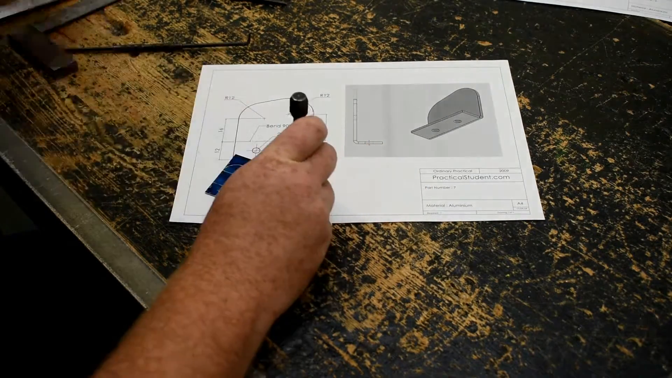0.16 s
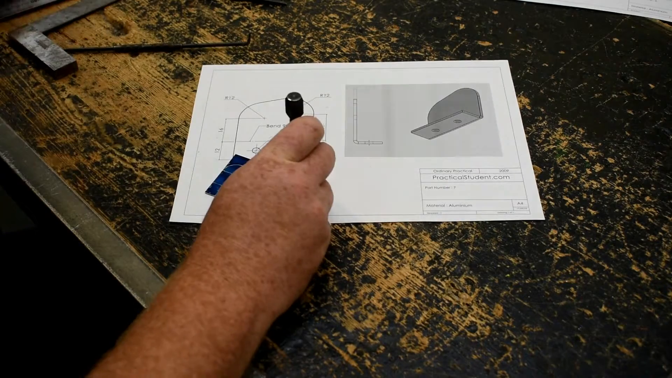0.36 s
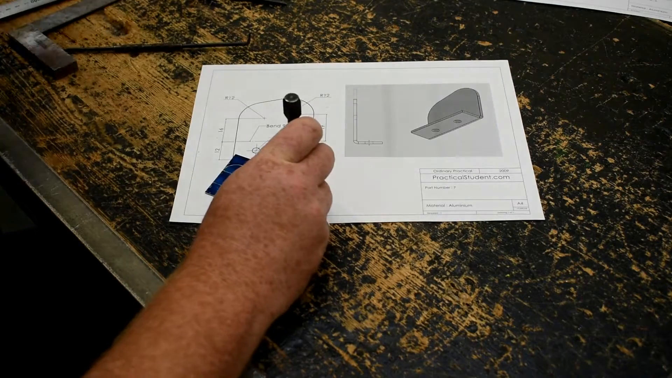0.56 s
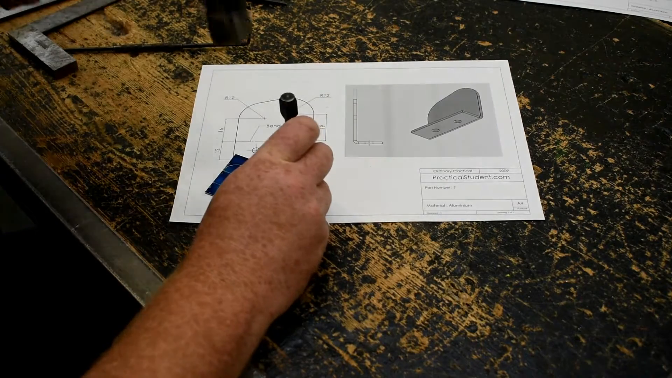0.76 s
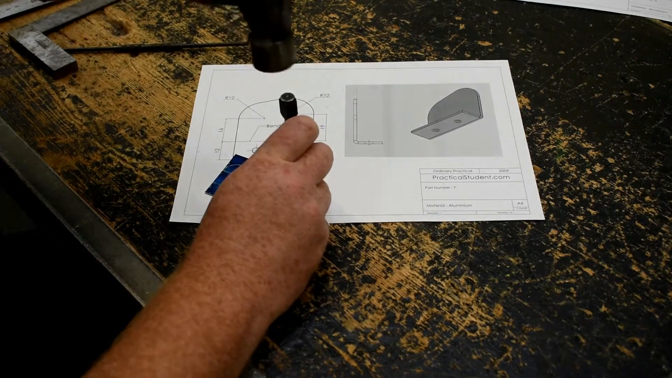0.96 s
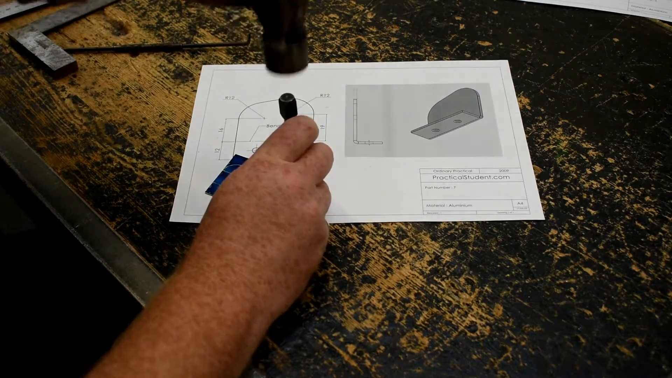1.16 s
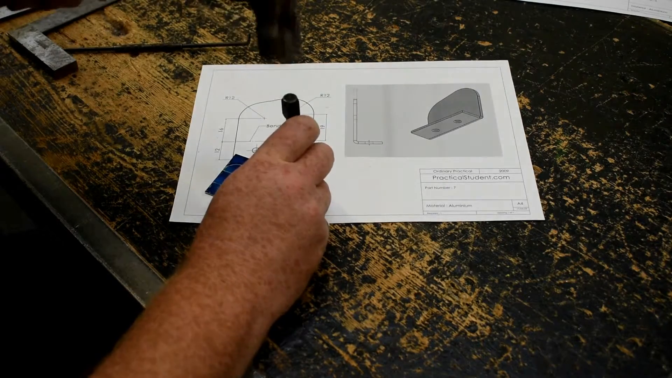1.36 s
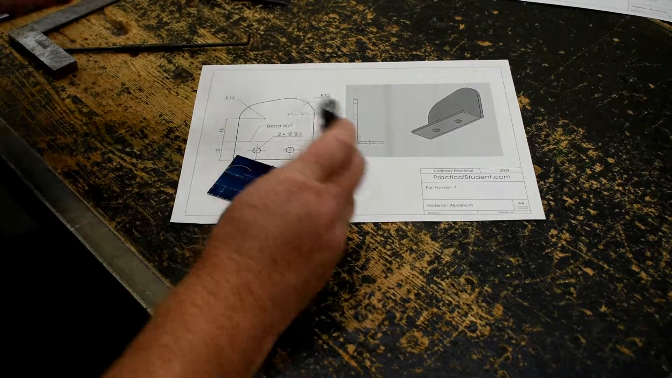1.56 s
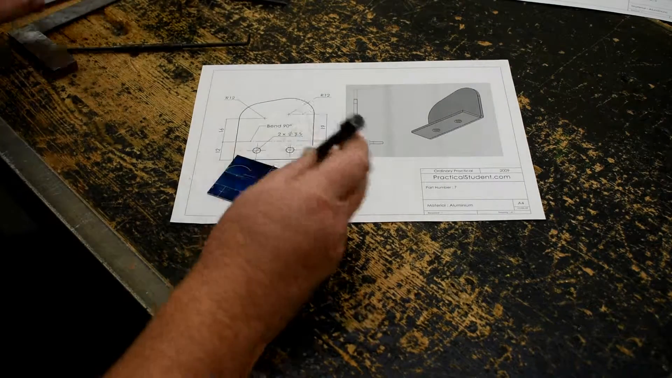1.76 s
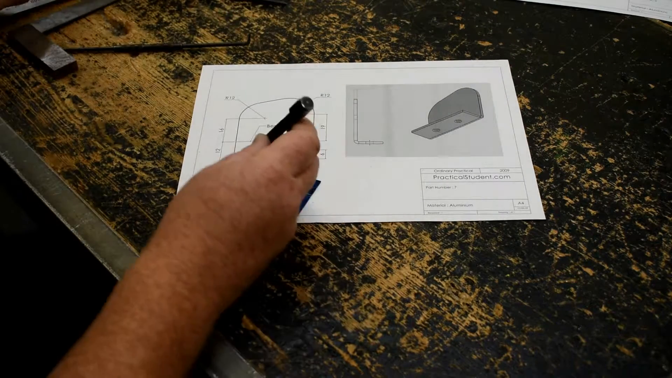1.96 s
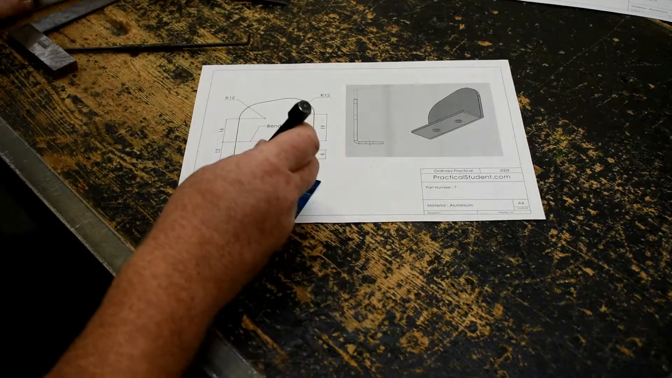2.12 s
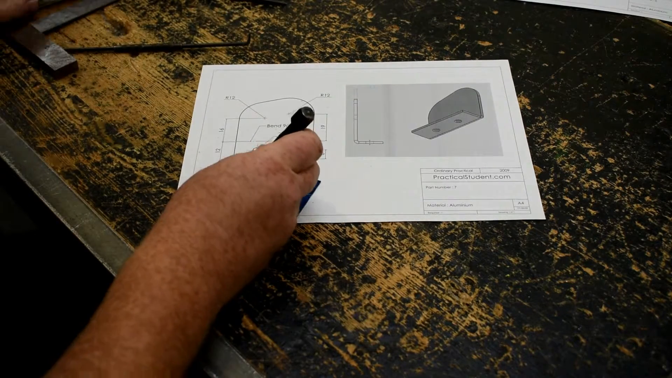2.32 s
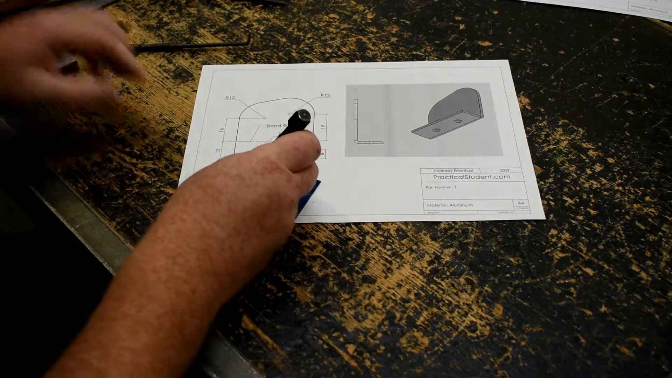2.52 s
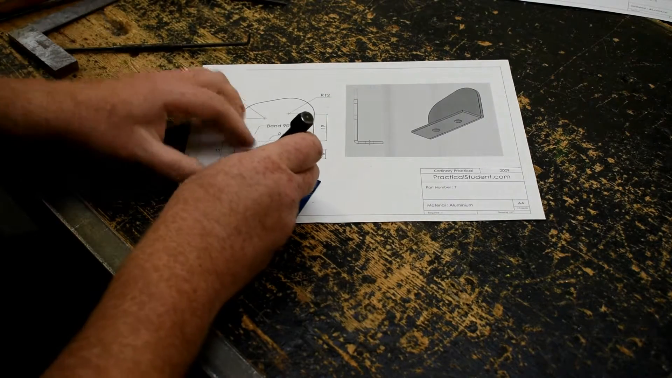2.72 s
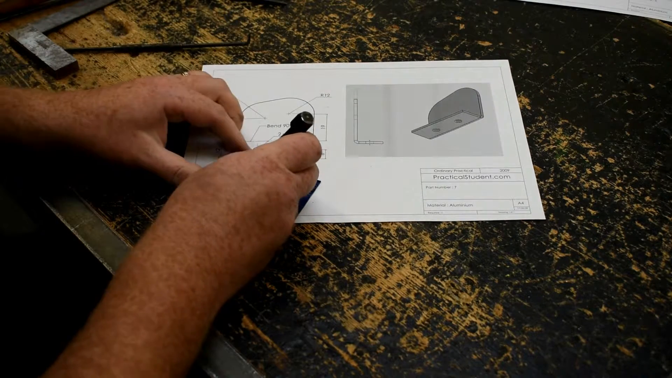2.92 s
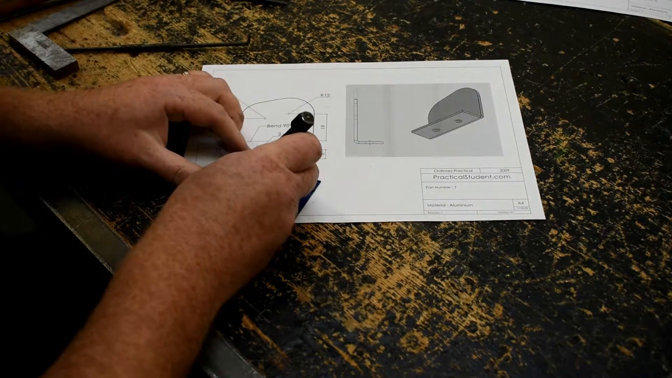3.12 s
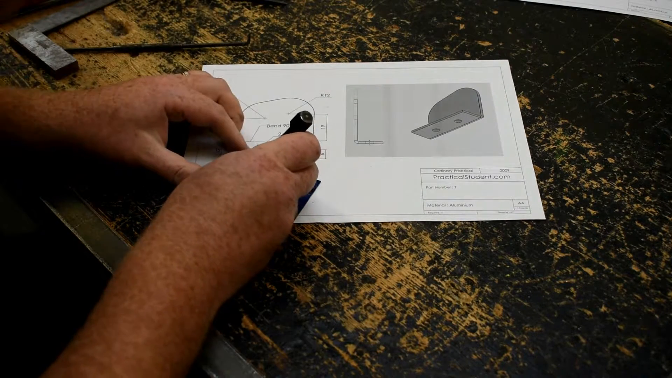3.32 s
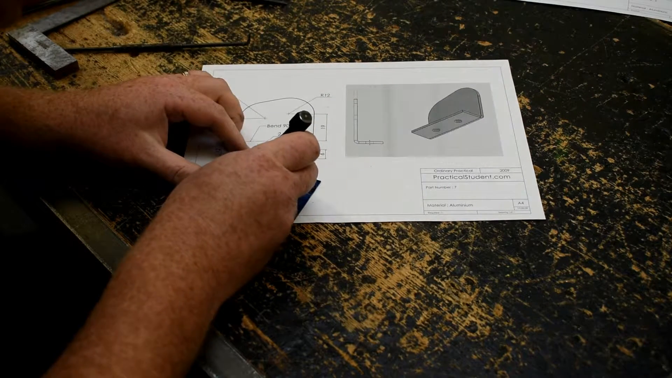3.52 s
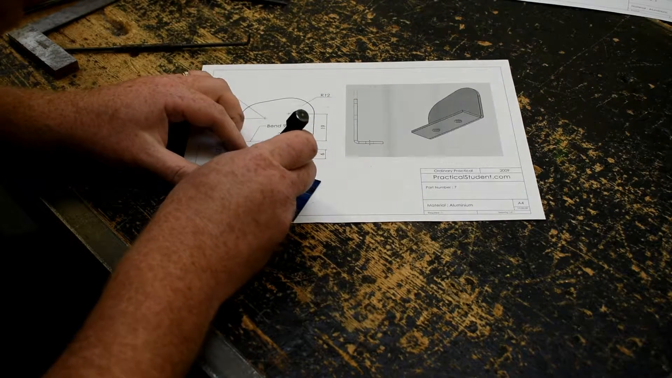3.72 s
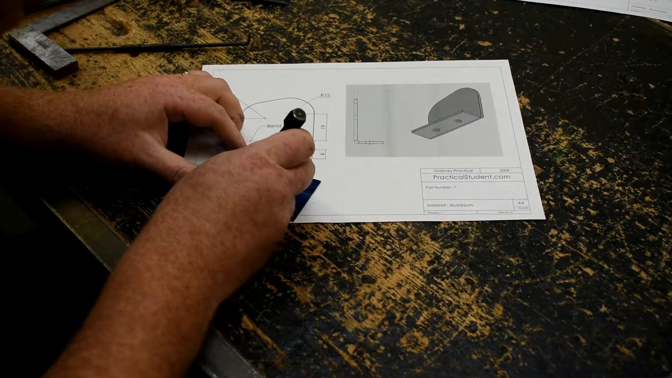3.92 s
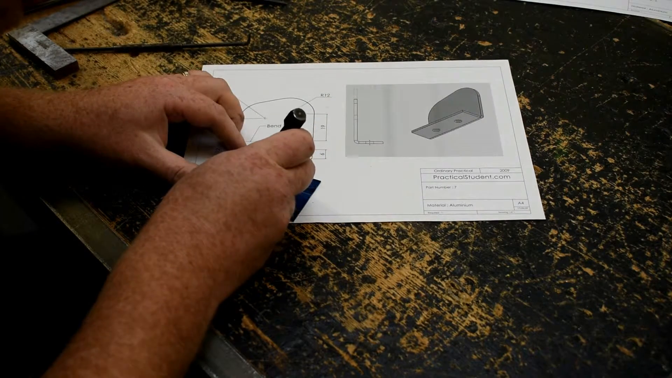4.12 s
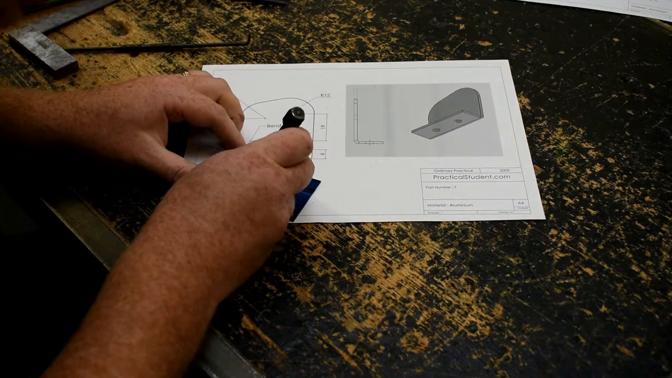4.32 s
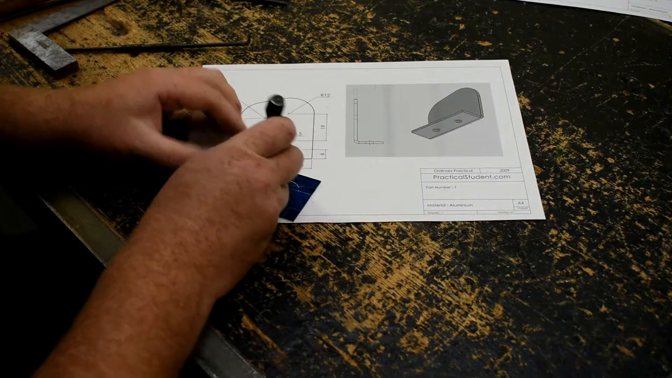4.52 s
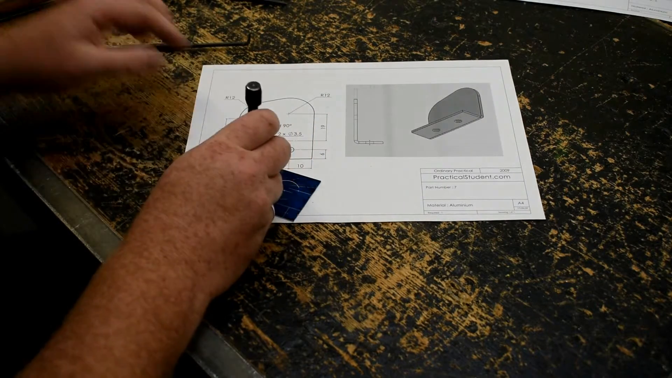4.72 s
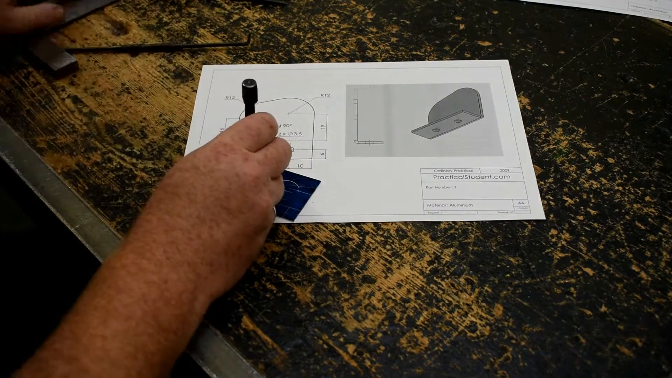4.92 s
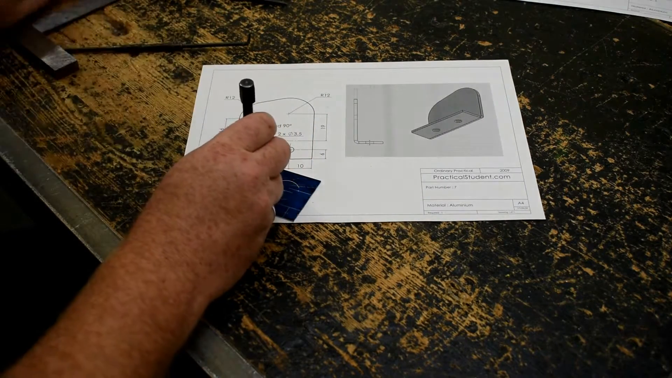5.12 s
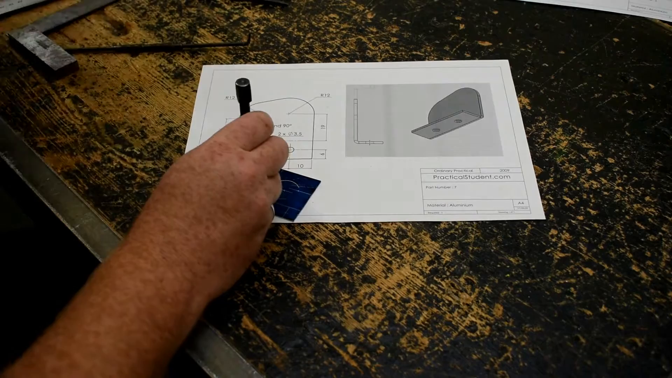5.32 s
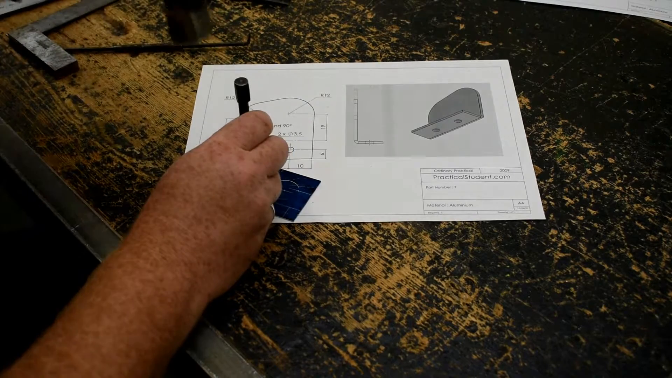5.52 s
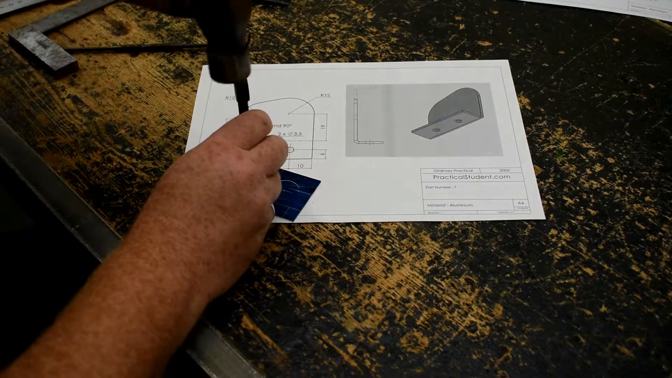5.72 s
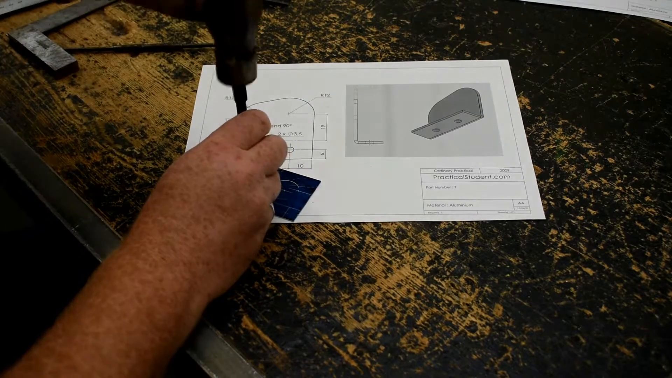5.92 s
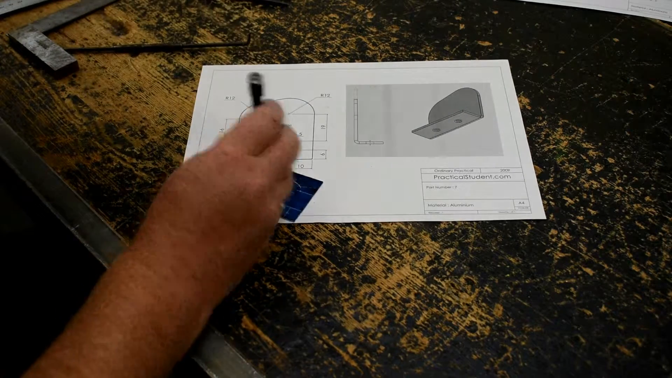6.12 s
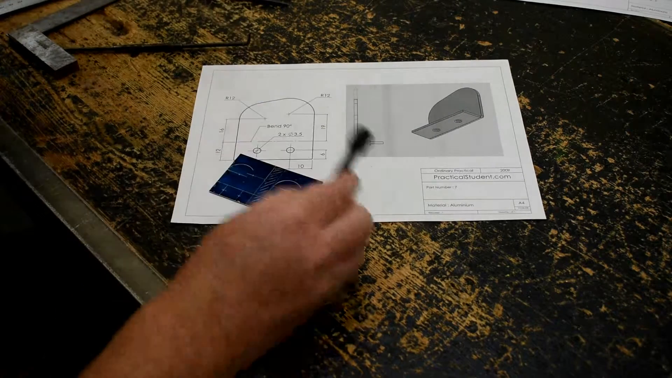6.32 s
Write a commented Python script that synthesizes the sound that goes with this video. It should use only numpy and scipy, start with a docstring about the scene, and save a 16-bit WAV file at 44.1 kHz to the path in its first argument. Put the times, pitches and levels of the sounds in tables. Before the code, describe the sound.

Two loud hammer blows on a steel punch, several seconds apart, with a clatter of tools between them over a faint fan hum.

```python
"""A hammer strikes a centre punch twice, on a small steel plate on a wooden bench: each blow cracks,
thumps the bench, rings the punch and briefly overloads the close microphone. Between the blows the
hammer is laid down with a clatter among steel tools, and later dragged off them again.
The bare workshop echoes; a fan hums under a faint drone and whine."""
import sys
import numpy as np
from scipy import signal
from scipy.fft import rfft, irfft
from scipy.io import wavfile
from scipy.ndimage import uniform_filter1d

SR = 44100
rng = np.random.default_rng(int(sys.argv[2]) if len(sys.argv) > 2 else 0)


def unload_wav(signal):
    """Save mono or channel-first audio to the path in sys.argv[1] as 16-bit WAV at rate SR, clipped to [-1, 1]."""
    wavfile.write(
        sys.argv[1],
        SR,
        np.round(np.clip(np.atleast_2d(signal).T, -1, 1) * 32767).astype(np.int16),
    )


N = 280646
T = np.arange(N) / SR

# Bench top modes. Each row: frequency in Hz, level in dB, t60 in seconds.
BENCH_MODES = [(300, -22.5, .028), (407, -12.5, .026), (532, -25, .03), (808, -18, 0.02),
               (1436.4, -28.5, 0.024), (1750, -31, .015)]
# Spectrum of rough steel contact. Each row: frequency in Hz, gain in dB.
GRIT_SPECTRUM = [(60, -15), (200, -11), (520, 0.5), (1000, 5.5), (1500, 2.5), (1850, 3.5), (2600, -1.5),
                 (4000, -1.5), (6000, -2), (7600, -7), (9500, 3), (12500, -9.5), (16000, -9.5)]


def undb(db):
    """Decibels to gain."""
    return 10 ** (np.asarray(db) / 20)


def unit(x):
    """Scale to rms 1."""
    return x / np.sqrt(np.mean(x ** 2))


def on_log_axis(freqs, hz, values):
    """Interpolate over log frequency."""
    return np.interp(np.log(freqs + 1), np.log(hz), values)


def colour(x, points, tilt_db_per_oct=0, shelf_hz=None, size=2048):
    """Minimum-phase filter through (Hz, dB) points, with a tilt and an optional step down at shelf_hz."""
    f = np.fft.rfftfreq(size, 1 / SR)
    gain = undb(on_log_axis(f, *np.transpose(points)) + tilt_db_per_oct * np.log2((f + 100) / 5000))
    if shelf_hz:
        gain *= 0.73 + 0.89 / (1 + (f / shelf_hz) ** 20)
    cepstrum = irfft(np.log(gain))
    cepstrum[1:size // 2] *= 2
    cepstrum[size // 2 + 1:] = 0
    return signal.fftconvolve(x, irfft(np.exp(rfft(cepstrum))))[:len(x)]


def ring(modes, hold=1, length_s=0.25):
    """Decaying sines from (Hz, dB, t60 s) rows; hold scales the t60."""
    t = T[:int(length_s * SR)]
    return sum(undb(db - 60 * t / (t60 * hold)) * np.sin(2 * np.pi * hz * t) for hz, db, t60 in modes)


def burst(decay_s, push=0):
    """Brief contact: decaying chatter over a push, whitened to a flat spectrum."""
    t = T[:SR // 4]
    spectrum = rfft((push + rng.standard_normal(len(t))) * np.exp(-t / decay_s))
    return irfft(spectrum / np.abs(spectrum))[:SR // 20]


def add(track, start_s, x):
    """Mix x into the track."""
    i = int(start_s * SR)
    track[i:i + len(x)] += x[:N - i]


def tone(hz):
    """Sine of rms 1 on a moving pitch."""
    return unit(np.sin(2 * np.pi * np.cumsum(hz) / SR))


def walk(rate_hz):
    """Smooth random wander, spread near 1."""
    k = int(SR / rate_hz)
    steps = np.repeat(rng.standard_normal(N // k + 1), k)
    return 1.4 * uniform_filter1d(uniform_filter1d(steps, k), k)[:N]


def fan(air_db=-55.5, hum_trim_db=-1, waver_db=2, wander_hz=2.5, flutter=0.0024):
    """Steady air noise with fluttering tones; the hiss is wider than the rumble."""
    # Air noise spectrum. Each row: frequency in Hz, relative density in dB.
    air_spectrum = [(15, -60), (25, -23), (69, -12.5), (129, -9), (169, -22.5), (188, -12.5), (305, -7),
                    (331, -17.5), (495, -10.5), (614, -15), (826, -18), (15500, -39.5)]
    # Its stereo width. Each row: frequency in Hz, side minus mid in dB.
    air_width = [(60, -18), (110, -15.5), (200, -16.5), (380, -15.5), (700, -9.5), (1290, -6.5),
                 (2380, -3.5), (4400, -0.5), (8120, 2), (15000, 2)]
    # Fan and mains tones. Each row: frequency in Hz, level before trim in dB.
    hum_tones = [(70.0, -70), (301.5, -63.5), (500.6, -65.5), (576.0, -64), (812.9, -70.5)]
    f = np.fft.rfftfreq(N, 1 / SR)
    shape = undb(on_log_axis(f, *np.transpose(air_spectrum)))
    mid, side = irfft(rfft(rng.standard_normal((2, N))) * shape, N)
    side = irfft(rfft(side) * undb(on_log_axis(f, *np.transpose(air_width))), N)
    out = undb(air_db) * (mid + np.array([side, -side])) / np.std(mid)
    for hz, db in hum_tones:
        pitch_hz = hz * (1 + flutter * walk(90)) + wander_hz * walk(6.9)
        out += undb(db + hum_trim_db + waver_db * walk(27)) * tone(pitch_hz)
    return out


def drone(start_hz=74.5, climb_hz_per_s=18.5, swell_s=0.17, octave_db=-10, waver_db=2):
    """A low tone and its octave climb steadily, swelling and fading."""
    # Swells. Each row: peak time in seconds, level in dB.
    swells = [(.03, -55.5), (.52, -60), (1.1, -58.5)]
    hz = start_hz + climb_hz_per_s * T
    envelope = sum(undb(db) * np.exp(-((T - peak_s) / swell_s) ** 2) for peak_s, db in swells)
    return envelope * undb(-waver_db * walk(7.8)) * (tone(hz) + undb(octave_db) * tone(2 * hz))


def whine(hz=10076, level_db=-75, pulse_hz=66.7, accent_db=6, depth_db=5, jitter_hz=30):
    """A thin, unsteady electronic tone in quick pulses, every fourth one stronger."""
    cycle = pulse_hz * T
    accented = np.floor(cycle) % 4 == 0
    pulses = undb(accent_db * accented - depth_db * np.cos(2 * np.pi * cycle))
    return undb(level_db) * unit(pulses * tone(hz + jitter_hz * walk(90)))


def echo_onset(t, ceiling_s=0.015, slap_width_s=0.00073, walls_s=0.028, walls_rise_s=0.002):
    """Envelope: weak early echoes and one ceiling slap, then a 6 dB rise as the walls answer."""
    slap = undb(-3.5) * np.exp(-((t - ceiling_s) / slap_width_s) ** 2)
    walls = (1 + np.tanh((t - walls_s) / walls_rise_s)) / 2
    return slap + undb(-15 + 6 * walls)


def workshop(x, standing_rise_s=0.0057):
    """Diffuse echoes, shorter and wider in the treble, over the room's standing waves."""
    # Reverberation bands. Each row: centre in Hz, level in dB, t60 in seconds, side minus mid in dB.
    reverb_bands = [(50, -4.5, 1.7, -33.5), (172, 12, .9, -31), (400, 10.5, 0.94, -30.5),
                    (850, 8, 1.034, -23), (1850, 3.5, 1.06, -19), (4500, 0, 0.91, -11.5),
                    (5700, 0.5, 0.85, -7.5), (6800, -3.5, 0.69, -9.5), (10000, -7, .55, -3),
                    (15000, -11, 0.35, -0.5)]
    # Standing waves. Each row: frequency in Hz, level in dB, t60 in seconds.
    room_modes = [(48, -56.5, 1), (97, -39.5, 0.55), (107.2, -50, 0.58), (131.9, -46, 0.6),
                  (164, -50, 0.38), (205.3, -52.5, .9), (249.3, -50.5, 1.4), (304, -45.5, 0.63),
                  (307, -46.5, 0.41), (398, -53.5, 0.56), (415, -55, 0.84), (496, -48.5, 1),
                  (523.6, -46.5, 1.1), (612, -63, 0.88), (845, -62, 1.1), (797, -62.5, 1.5),
                  (810, -55, 0.37)]
    count = 2 ** 16
    t, f = T[:count], np.fft.rfftfreq(count, 1 / SR)
    noise = rfft(rng.standard_normal((2, count)))
    centres_hz = np.array(reverb_bands)[:, 0]
    onset = echo_onset(t)
    diffuse = np.zeros((2, count))
    for (_, db, t60_s, side_db), band in zip(reverb_bands, np.eye(len(reverb_bands))):
        mid, side = irfft(noise * on_log_axis(f, centres_hz, band))
        fade = onset * undb(-60 * t / t60_s)
        stereo = mid + undb(side_db) * np.array([side, -side])
        diffuse += undb(db) * fade / np.linalg.norm(fade) * stereo
    standing = ring(room_modes, length_s=2)[:count] * (1 - np.exp(-t / standing_rise_s))
    return signal.fftconvolve(x[None], diffuse + standing, axes=1)[:, :N]


def steel_ring(hold=1, scatter_db=2, detune_hz=70):
    """The tools' modes, shifted by where they are touched; neighbours swing in opposite senses."""
    # Steel tool modes. Each row: frequency in Hz, level in dB, t60 at hold 1 in seconds.
    steel_modes = [(6080, -12.5, 0.032), (6260, -18.5, 0.017), (6850, -10.5, 0.014), (7100, -10.5, 0.023),
                   (8215, -6, 0.022), (8840, -11, 0.0766), (9000, -4, 0.029), (9150, -18, 0.053),
                   (9320, 1, .018), (9780, -6.5, 0.0083), (10040, 1, 0.012), (10280, -4, 0.012),
                   (10880, 0, .011), (11400, -4, 0.016), (11850, -2, .011), (12450, -1.5, 0.0078),
                   (13250, -1.5, 0.01137), (14000, -11, .012), (14800, -19, .012), (15550, -13, .02)]
    hz, db, t60_s = np.transpose(steel_modes)
    detune, scatter = rng.standard_normal((len(hz), 2)).T
    hz = hz + detune_hz * detune * t60_s.min() / t60_s  # the most damped shift most
    modes = np.transpose([hz, db + scatter_db * scatter, t60_s])
    return ring(modes[::2], hold) - ring(modes[1::2], hold)


def scrapes(grain_db=4, bite_s=0.00071, max_rise_share=0.22, sag=0.28, release_share=0.37):
    """Sliding steel catches in dense uneven clicks, which rasp and keep the tools ringing."""
    # Slides. Each row: start in seconds, length in seconds, level in dB, relative ring in dB,
    # rasp tilt in dB per octave.
    slides = [(0.276, 0.39, -60, -12, 0.5), (2.149, 0.054, -18, -3.5, 1.5), (2.262, 0.11, -25, -6, 1),
              (2.354, 0.098, -20.5, 3.5, 1), (2.437, .087, -19.5, 0.5, 2.5), (4.61, 0.094, -62, -11, 5),
              (4.972, 0.12, -72, 12, -7.5), (5.074, 0.089, -38, -33, -1), (5.119, 0.044, -24, -22, 2)]
    out, t = np.zeros(N), T[:SR // 2]
    for start_s, length_s, db, ring_db, tilt_db_per_oct in slides:
        noise, grain = rng.standard_normal(len(t)), rng.exponential(size=len(t))
        rise_s = min(bite_s / undb(db), max_rise_share * length_s)  # a harder push bites sooner
        easing = np.interp(t / length_s, [0, 1 - release_share, 1], [1, 1 - sag, 0])
        pressure = np.minimum(t / rise_s, 1) * easing
        clicks = undb(db) * pressure * unit(noise * undb(grain_db * np.minimum(grain, 4)))
        steel = steel_ring()
        add(out, start_s, colour(clicks, GRIT_SPECTRUM, tilt_db_per_oct))
        add(out, start_s, undb(ring_db) * signal.fftconvolve(clicks, steel / np.linalg.norm(steel)))
    return out


def clinks(chatter_s=0.0024, tick_s=0.00073):
    """Steel touches steel: a tick, an instant of chatter, and a longer ring than a slide allows."""
    # Touches. Each row: start in seconds, ring level in dB, tick level in dB.
    touches = [(2.306, -24.5, -14), (2.3445, -10.5, -12), (2.3808, -24.5, -9.5), (2.392, -28, -16),
               (2.406, -15.5, 3.5), (2.459, -23, -19.5), (2.484, -27.5, -11), (5.1681, -24.5, -6)]
    out = np.zeros(N)
    for start_s, ring_db, tick_db in touches:
        add(out, start_s, undb(ring_db) * signal.fftconvolve(steel_ring(hold=1.4), burst(chatter_s)))
        add(out, start_s, undb(tick_db) * colour(burst(tick_s), GRIT_SPECTRUM, tilt_db_per_oct=-1.5))
    return out


def knocks(t60_cycles=5.5, cutoff_ratio=0.54, handle_width_oct=0.58):
    """A soft contact gives a few cycles at its pitch, shakes the bench and wakes nearby handle modes."""
    # Hammer head and handle meeting the bench. Each row: start in seconds, level in dB, pitch in Hz,
    # relative bench thud in dB.
    contacts = [(.473, -33, 340, 2), (2.16, -29.5, 99.6, 23.5), (2.175, -21.5, 367, 19),
                (2.307, -20.5, 424, -5.5), (2.33, -13, 400, -2.5), (2.348, -25.5, 105, 13),
                (2.3834, 0.5, 720, -20), (2.427, -4, 594, -13), (5.099, -13.5, 636, -33),
                (5.1079, -17, 1000, -15), (5.122, -21, 1600, -15)]
    # Wooden handle modes. Each row: frequency in Hz, level in dB, t60 in seconds.
    handle_modes = [(554, -17.5, .045), (840, -16, 0.04), (1810, -4.5, 0.077)]
    out = np.zeros(N)
    for start_s, db, hz, thud_db in contacts:
        t60_s = t60_cycles / hz
        contact = ring([(hz, 0, t60_s), (hz * 1.9, -6, t60_s)])
        handle = sum(np.exp(-(np.log2(mode[0] / hz) / handle_width_oct) ** 2) * ring([mode])
                     for mode in handle_modes)
        knock = contact + undb(thud_db) * ring(BENCH_MODES) + handle
        highpass = signal.butter(2, cutoff_ratio * hz, "high", fs=SR, output="sos")
        add(out, start_s, undb(db) * signal.sosfilt(highpass, knock))
    return out


def blows(crack_s=0.0008, ring_t60_s=0.013, ring_lag_s=0.0005, thud_lag_s=0.002047, plate_width_oct=0.45):
    """Each blow cracks, thumps the bench and rings the punch, which the fingers damp at once."""
    # Hammer on punch. Each row: start in seconds, crack level in dB, punch ring in Hz, ring level in dB,
    # contact shelf in Hz, bench thud in dB, plate resonance in Hz, plate boost in dB.
    strikes = [(1.2727, 14.5, 10880, -5.5, 12000, -0.5, 3932, 5),
               (5.9658, 15.5, 9200, -5.5, 10000, 0.5, 6230, 2)]
    # Spectrum of the steel-on-steel crack. Each row: frequency in Hz, gain in dB.
    crack_spectrum = [(40, -23), (90, -6), (400, -9), (600, 4.5), (950, 1.5), (1600, 0), (2000, -3.5),
                      (2700, -4.5), (4000, -4.5), (5600, -1), (6700, -6), (7900, -1.5), (9400, 5),
                      (16000, -9.5)]
    impact, punch = np.zeros(N), np.zeros(N)
    hz, crack_db = np.transpose(crack_spectrum)
    for start_s, db, ring_hz, ring_db, shelf_hz, thud_db, plate_hz, plate_db in strikes:
        # the plate's resonance depends on where the tip stands
        boost_db = plate_db * np.exp(-(np.log2(hz / plate_hz) / plate_width_oct) ** 2)
        spectrum = np.transpose([hz, crack_db + boost_db])
        add(impact, start_s, undb(db) * colour(burst(crack_s, push=0.8), spectrum, shelf_hz=shelf_hz))
        add(impact, start_s + thud_lag_s, undb(thud_db) * ring(BENCH_MODES))
        punch_modes = [(ring_hz, 0, ring_t60_s), (9450, -22, 0.035)]
        add(punch, start_s + ring_lag_s, undb(ring_db) * ring(punch_modes))
    return impact, punch


def scene(tools_right_db=0.2):
    """Hammer and tools arrive directly and through the room, over fan, drone and whine."""
    # Share of the direct sound that differs between the microphone's two ports, scattered by its housing.
    # Each row: frequency in Hz, side gain in dB.
    port_scatter = [(40, -22.5), (250, -30.5), (1500, -26.5), (4500, -21), (15000, -10)]
    impact, punch = blows()
    knock, clink, scrape = knocks(), clinks(), scrapes()
    pan = undb(np.array([[-tools_right_db], [tools_right_db]]) / 2)
    direct = impact + punch + knock + pan * (clink + scrape)
    side = colour(signal.fftconvolve(direct[0], burst(decay_s=0.0003))[:N], port_scatter)
    room_send = (undb(1) * impact + undb(-6.5) * punch + undb(-10.5) * knock
                 + undb(-5.5) * clink + undb(0.5) * scrape)
    return direct + np.array([side, -side]) + workshop(room_send) + fan() + drone() + whine()


def record(dry, highpass_hz=45, clip_level=0.9, lowpass_hz=15750):
    """The recorder thins the deep bass, clips the cracks near full scale and cuts the top."""
    thin = signal.sosfilt(signal.butter(2, highpass_hz, "high", fs=SR, output="sos"), dry)
    clipped = np.clip(thin, -clip_level, clip_level)
    return signal.sosfilt(signal.ellip(10, 0.1, 90, lowpass_hz, fs=SR, output="sos"), clipped)


dry = scene()
out = record(dry)
unload_wav(out)
```